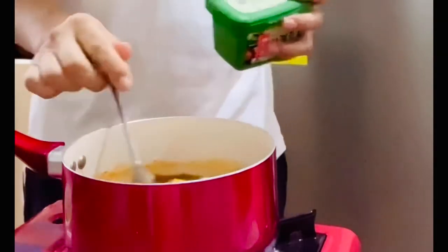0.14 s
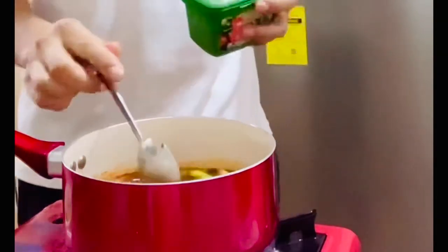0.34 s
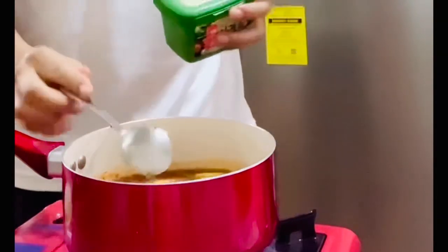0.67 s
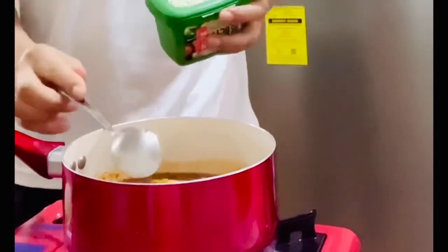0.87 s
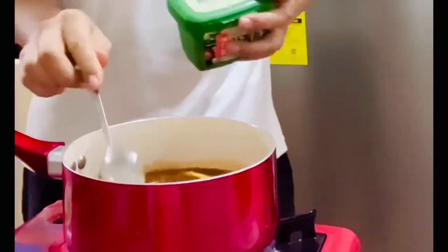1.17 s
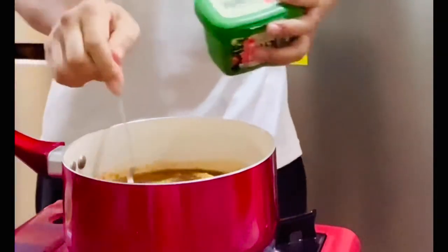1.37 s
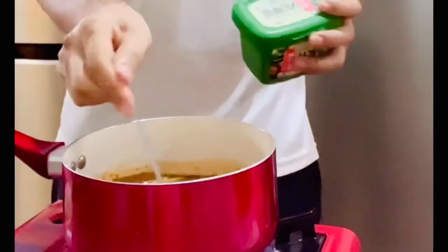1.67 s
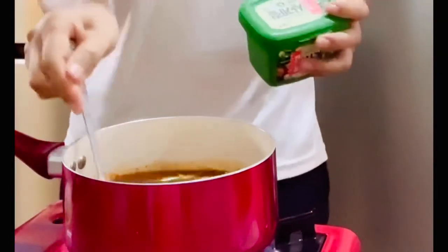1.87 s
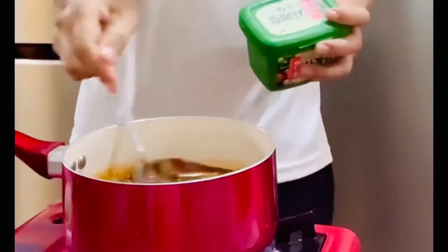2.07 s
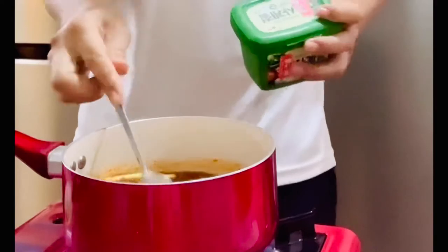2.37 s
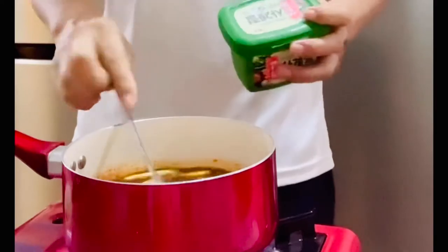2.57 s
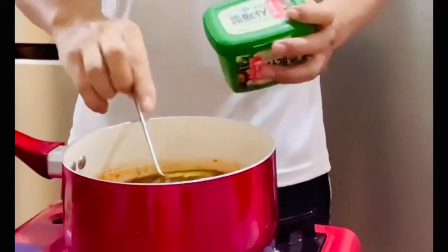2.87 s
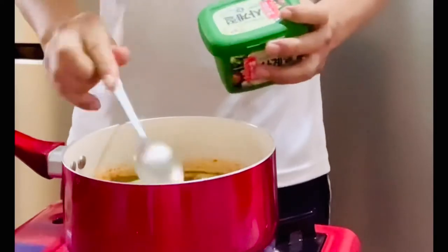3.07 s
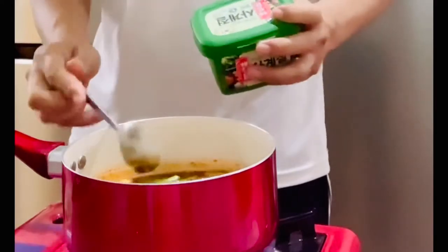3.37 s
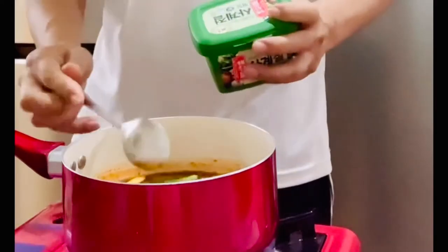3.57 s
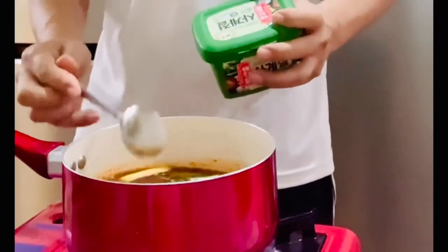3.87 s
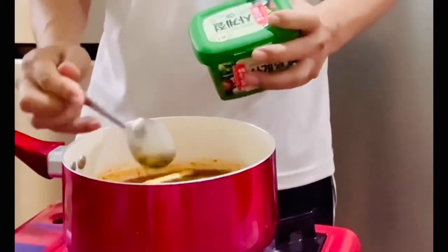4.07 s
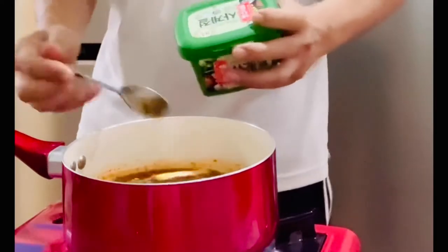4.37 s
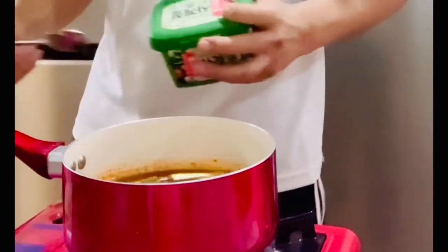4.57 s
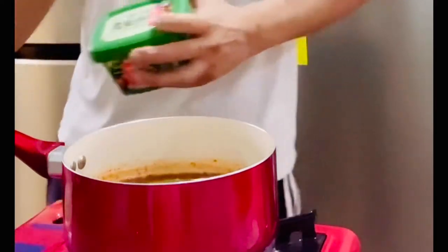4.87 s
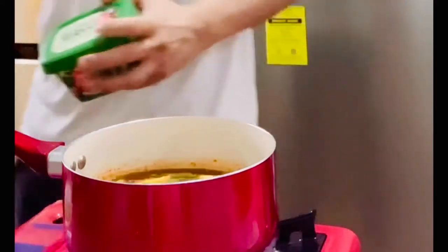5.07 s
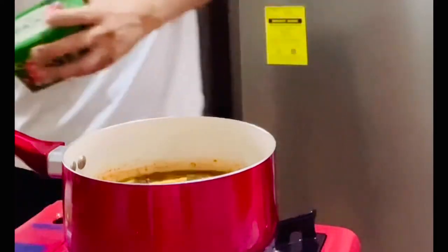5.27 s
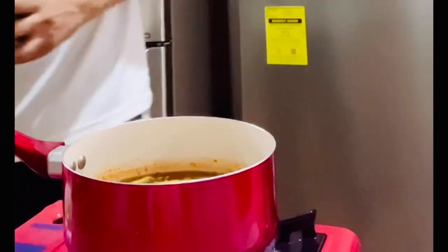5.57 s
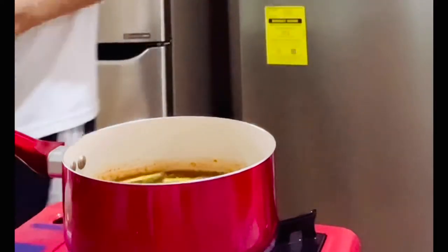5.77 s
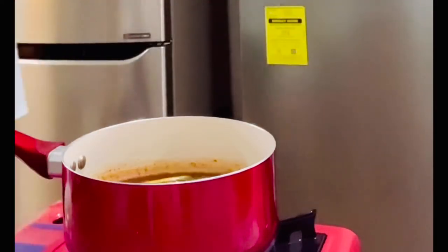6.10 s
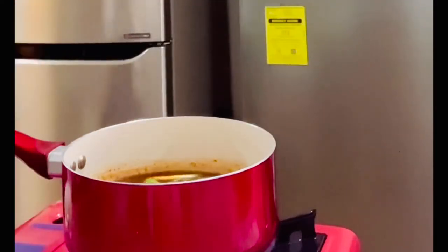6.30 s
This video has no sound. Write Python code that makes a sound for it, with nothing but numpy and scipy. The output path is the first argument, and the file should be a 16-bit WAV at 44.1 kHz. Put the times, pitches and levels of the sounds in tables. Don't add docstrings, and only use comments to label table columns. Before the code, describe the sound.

A metal spoon stirs broth in an enamelled saucepan, taps its rim in sharp ringing knocks, then clatters down on a hard counter.

```python
import sys
import numpy as np
from scipy import signal
from scipy.io import wavfile

SR = 44100
rng = np.random.default_rng(int(sys.argv[2]) if len(sys.argv) > 2 else 0)


def inscribe(sig):
    pcm = np.round(np.clip(np.atleast_2d(sig).T, -1, 1) * 32767)
    wavfile.write(sys.argv[1], SR, pcm.astype(np.int16))


def nominal_scale(level):
    x = np.asarray(level, float) / 20
    return 10 ** x


N = 284004

BAND_EDGES_HZ = np.geomspace(20, 18000, 28)

# freq_hz, level_db_per_hz
AIR_SPECTRUM = [(12, -39), (20, -39.5), (65, 5.5), (91, -19), (131, -4.5), (200, -9.5), (670, -17),
                (1470, -24.5), (1690, -26.5), (2060, -27), (3940, -29), (7100, -31), (9410, -41.5),
                (15200, -28), (16500, -36)]
# freq_hz, left_right_likeness
AIR_LIKENESS = [(60, 1), (95, -0.52), (150, 1), (240, -0.18), (380, 0.37), (600, 0.3), (950, -0.27),
                (1500, -0.071), (2380, -0.22), (3770, 0.16), (5980, -0.59), (9470, 1), (15000, -0.038)]
# freq_hz, left_minus_right_db
AIR_BALANCE = [(60, 4), (240, 0.5), (950, 0), (3770, 2.5), (15000, -1)]
# freq_hz, width_hz, rms_db, left_right_likeness
HUMS = [(28.9, 18, -59, 1), (59.83, 3.9, -57, 1), (127.2, 15, -64, 0.88), (3856, 150, -73.5, 0.53),
        (9274, 280, -70.5, 0.85), (9840, 510, -74, 1), (10450, 930, -72, 1)]
# start_s, level_db
SLOSH = [(0.0, -11), (1.49, -5), (5.04, -1.5)]
# start_s, level_db
RUSTLE = [(4.42, -64), (5.876, -48), (6.09, -56)]

# freq_hz, t60_s
ROOM_T60 = [(100, 0.78), (400, 0.32), (1500, 0.5), (4000, 0.43), (9000, 0.37), (16000, 0.12)]
# freq_hz, left_right_likeness
ROOM_LIKENESS = [(100, 0.4), (400, 0.88), (1500, 0.011), (4000, 0.1), (7000, -0.066), (9500, 0.63),
                 (12500, 0.97), (15000, -1.6)]
# delay_s, level_db
ECHOES = [(.008, 2.5), (0.014, -10.5), (0.033, -24)]

# start_s, level_db
WHINE_SWELLS = [(5.47, -67), (5.92, -75), (6.13, -70), (6.22, -71), (6.33, -61), (6.41, -65)]
# start_s, peak_db
FOOTFALLS = [(6.054, -40)]

# freq_hz, level_db, t60_s
SPOON_MODES = [(4549, -9, .3), (4712, -12, .3), (6105, -15, .25), (7540, -14, .25), (8091, -3, .25),
               (8204, -10, .2), (8900, -2.5, .28), (11180, -2, .27), (11260, -10, .3), (11552, -9, .32),
               (12130, -22, .22), (12550, -7, .4), (13104, -8, .28), (14260, -5, .2), (14326, -3, .3),
               (15500, -12, .1)]
# freq_hz, level_db, t60_s
COUNTER_MODES = [(466, -8.5, 0.17), (478, -5.5, 0.14), (1973, -11, 0.25), (2025, -3.5, 0.15),
                 (3050, -12, 0.08)]
# start_s, peak_db, thud_below_2500_hz_db, edge_above_7000_hz_db, ring_db
DROPS = [
    (4.8374, -14, -16.5, 0, -21),
    (4.8422, -5.5, -14, -22.5, 2),
    (4.9208, -11.5, -19, -18.5, 4.5),
]
# freq_hz, level_db_per_hz
DROP_CRACK = [(59, -40), (100, -16), (135, -3), (279, -21), (460, -4), (750, -11.5), (1030, -3),
              (1360, -70), (2040, 2), (2700, -10.5), (3970, 0), (7070, -19), (7860, 6), (10600, -22),
              (14300, -9), (16600, 4)]
# start_s, peak_db, thud_below_2500_hz_db, edge_above_7000_hz_db
LANDINGS = [(5.0533, -12.5, -17, 1), (5.0703, -15.5, -32, -2), (5.0794, -11.5, -19.5, 7.5),
            (5.0904, -22, -12, 8), (5.0964, -34, -30, 7), (5.1128, -18.5, -14, -5), (5.1664, -16, -17.5, 2)]
# freq_hz, level_db_per_hz
COUNTER_CRACK = [(59, -32), (100, -3), (256, -5), (541, -0.5), (1090, -8.5), (1350, -12), (2200, 0),
                 (2900, 4.5), (4580, 7), (5550, -18), (7810, 7.5), (9670, -34), (14200, -9), (15500, -29),
                 (16500, -43)]
# start_s, level_db, hold_s
CHATTER = [(5.052, -24.5, 0.04), (5.082, -32, 0.084)]

# freq_hz, width_hz, level_db
PAN_FLOOR = [(447, 75.5, 0), (855, 127, -1.5), (1531, 42, -3), (1720, 460, -15.5), (2470, 20, -22),
             (3430, 270, -14), (3840, 400, -21.5)]
# freq_hz, level_db_per_hz
GRIT = [(710, 2), (1200, -5), (1560, -7), (2250, -6), (3510, -4.5), (7100, -21), (7740, -16),
        (12700, -29.5), (16000, -18)]
# start_s, pressure_db, pitch_hz
DRAG = [(1.3, -44.5, 829), (1.316, -47, 834), (1.352, -58, 840.4), (1.52, -52.5, 874),
        (1.784, -53.5, 881.6), (1.84, -43, 891), (1.93, -44, 965), (2.06, -116, 1051)]
# start_s, level_db, pitch_hz
NUDGES = [(0.0, -55, 894), (2.575, -56.5, 983), (2.673, -65, 842)]
# start_s, grit_db, hiss_db
SLIPS = [(0.102, -83, -85), (1.306, -72, -75), (1.358, -53, -59), (1.61, -49, -68), (1.838, -73, -90)]
# start_s, ring_peak_db, tick_peak_db,
# thud_peak_db, pitch_hz
KNOCKS = [(.268, -56, -50.5, -37.5, 944), (1.031, -35, -71, -34.5, 753), (1.311, -47, -40.5, -45.5, 802),
          (2.32, -40, -38.5, -56, 816), (2.555, -46.5, -74, -57, 1006), (2.657, -45.5, -57, -58, 827)]
# pitch_ratio, width_hz, level_db, share_of_tick_hardness
KNOCK_PARTS = [(0.6, 191, -2.5, 0.12), (1, 125, -2, 0.12), (1.95, 171.5, -15, 0.28),
               (2.5, 149, -5, 0.67), (4.15, 200, -12, 0.9), (4.75, 200, -22, 0.65)]

# freq_hz, level_db, t60_s
RIM_MODES = [(127.5, -20.5, 1), (280, -17.5, 0.95), (436.5, -21.5, 0.91), (488, -19, 0.53),
             (562.5, -12, 0.36), (1214, -14.5, 0.18), (2093, -14, 0.2), (2460, -10, 0.037),
             (3932, -14, 0.3), (4080, -16, 0.12), (3940, 3.5, 0.075), (4007, -10, 0.47), (3800, -45, 0.068),
             (5100, -34, 0.042), (5420, -13.5, 0.076), (6350, -45, 0.11), (6370, -11.5, 0.16),
             (6680, -31, 0.1), (7700, -15, 0.035)]
# freq_hz, level_db_per_hz
RIM_CRACK = [(59, -24), (130, -9), (300, -11.5), (471, -2.5), (1200, -16.5), (1420, -20.5), (2040, -8.5),
             (2580, -21), (3400, -11), (3940, -5.5), (4980, -22.5), (6150, -20.5), (6990, -25.5),
             (8110, -21.5), (13800, -36.5), (16000, -35)]
# start_s, peak_db, thud_below_700_hz_db, edge_above_5000_hz_db, ring_db
RIM_TAPS = [
    (0.3839, -19, -27.5, -17.5, -12),
    (0.62, -16.5, -26.5, -11.5, -5.5),
    (2.9289, -16, -30, -14, -18),
    (3.1659, -17, -27.5, -7, -2.5),
    (3.3693, -15.5, -28, -17, -4),
    (3.5749, -14, -26.5, -17, -7.5),
    (3.7729, -12.5, -29.5, -12, -4.5),
    (3.9604, -14, -28.5, -14.5, -8.5),
]
# start_s, peak_db, thud_db, edge_db, ring_db
REBOUNDS = [
    (0.66, -25.5, -10, 0, -11),
    (2.976, -29, -3, -1, -19),
    (0.2675, -37, -15, 8, -7),
]
# start_s, level_db
GRAZES = [(0.62, -46), (2.928, -52), (3.1684, -26.5), (3.771, -33.5), (4.838, -37.5)]


def rms_one(x):
    return x / np.sqrt(np.mean(x ** 2) + 1e-30)


def curve(rows, column, rest):
    rows = np.array(rows)
    return np.interp(np.arange(N) / SR, rows[:, 0], rows[:, column], left=rest, right=rest)


def at_hz(points, hz):
    freq_hz, value = np.transpose(points)
    return np.interp(np.log(hz), np.log(freq_hz), value)


def bandpass(x, low_hz, high_hz):
    return signal.sosfilt(signal.butter(2, [low_hz, high_hz], "band", fs=SR, output="sos"), x)


def bands(x):
    for k, (low_hz, high_hz) in enumerate(zip(BAND_EDGES_HZ, BAND_EDGES_HZ[1:])):
        yield np.sqrt(low_hz * high_hz), bandpass(x[k % 2], low_hz, high_hz)


def spread(mid, side, alike):
    alike = np.clip(alike, -1, 1)
    return np.sqrt(1 + alike) * mid + np.sqrt(1 - alike) * side * [[1], [-1]]


def drift(rate_hz):
    knots = rng.standard_normal(int(N / SR * rate_hz) + 2)
    return np.interp(np.arange(N) / SR * rate_hz, np.arange(len(knots)), knots)


def swells(times_s, levels_db, rise_s, fall_db_s, hold_s=0):
    steps = np.arange(0, N + 16, 16)
    since_s = steps / SR - np.reshape(times_s, (-1, 1))
    past_s = np.clip(since_s - np.reshape(hold_s, (-1, 1)), 0, None)
    shapes = np.clip(1 + since_s / rise_s, 0, 1) ** 2 * nominal_scale(-fall_db_s * past_s)
    return np.interp(np.arange(N), steps, nominal_scale(levels_db) @ shapes)


def resonance(x, hz, width_hz):
    r = np.exp(-np.pi * width_hz / SR)
    zeros = np.array([1, 0, -1]) * (1 - r * r) / 2
    poles = [1, -2 * r * np.cos(2 * np.pi * hz / SR), r * r]
    return signal.lfilter(zeros, poles, x + 1e-18)


def double_resonance(x, hz, width_hz):
    return resonance(resonance(x, hz, width_hz), hz, width_hz)


def clicks(times_s, gains):
    out = np.zeros(N)
    out[np.round(np.array(times_s) * SR).astype(int)] = gains
    return out


def grains(per_s, uneven_db):
    sizes = nominal_scale(uneven_db * np.minimum(rng.exponential(1, N), 5)) * rng.choice([-1, 1], N)
    return rms_one(sizes * (rng.random(N) < per_s / SR))


def coloured(x, spectrum):
    click = (np.arange(5000) == 0) + 1e-18
    response = sum(nominal_scale(at_hz(spectrum, hz)) * band for hz, band in bands([1. * click, -1. * click]))
    return signal.fftconvolve(x, response)[:len(x)]


def blows(table, modes, crack, split_hz, crack_s, crack_db, ring_db, damping, snap_db, impact):
    table, out, t = np.array(table), np.zeros((2, N)), np.arange(SR // 3) / SR
    hz, level_db, t60_s = np.transpose(modes)
    mean_thud_db, mean_edge_db = table[:, 2].mean(), table[:, 3].mean()
    for start_s, peak_db, thud_db, edge_db, own_db, *ring_hz in table:
        lean = [(split_hz[0] * 0.8, thud_db - mean_thud_db), (split_hz[0] * 1.25, 0),
                (split_hz[1] * 0.8, 0), (split_hz[1] * 1.15, edge_db - mean_edge_db)]
        tinted = [(f, db + at_hz(lean, f)) for f, db in crack]
        burst = rng.standard_normal(len(t)) * np.exp(-t / crack_s) * np.clip(t / 0.0031, 0, 1)
        burst = 0.63 * burst / np.sqrt(np.sum(burst ** 2))
        burst[20] += impact
        contact = nominal_scale(crack_db) * coloured(burst, tinted)

        pitch_hz = (hz * (ring_hz[0] / 4010 if ring_hz else 1))[:, None]
        mode_db = rng.normal(0, 1.04, len(hz))
        gains = nominal_scale(level_db + mode_db + at_hz(lean, hz) + ring_db + own_db)
        decay = nominal_scale(-60 * t / (damping * t60_s[:, None]))
        build = 1 - np.exp(-t * pitch_hz)
        rings = gains @ (np.sin(2 * np.pi * pitch_hz * t) * decay * build)

        snap = nominal_scale(snap_db) * np.diff(contact, prepend=0)
        i = round(start_s * SR)
        out[:, i:i + len(t)] += nominal_scale(peak_db) * np.array([contact + rings, contact + rings + snap])
    return out


def air():
    out, together = 0, drift(2.38)
    slosh = swells(*np.transpose(SLOSH), rise_s=0.32, fall_db_s=47.5)
    murmur_db = 1 + 20 * np.log10(1 + slosh)
    for hz, (mid, side) in bands(rng.standard_normal((2, 2, N))):
        lean_db = at_hz(AIR_BALANCE, hz) / 2 * np.array([[1], [-1]])
        wander_db = 0.7 * together + 1.2 * drift(9.6)
        gain = nominal_scale(at_hz(AIR_SPECTRUM, hz) + wander_db + murmur_db * (200 < hz < 5000) + lean_db)
        out = out + gain * spread(mid, side, at_hz(AIR_LIKENESS, hz))
    out = nominal_scale(-53) * rms_one(out)
    for hz, width_hz, level_db, alike in HUMS:
        mid, side = double_resonance(rng.standard_normal((2, N)), hz, width_hz)
        out = out + nominal_scale(level_db) * rms_one(spread(mid, side, alike))
    sleeve = rms_one(bandpass(rng.standard_normal(N), 4500, 15000))
    return out + sleeve * nominal_scale(-9) * swells(*np.transpose(RUSTLE), rise_s=0.027, fall_db_s=146)


def kitchen():
    t, tail = np.arange(SR // 2) / SR, 0
    for hz, (mid, side) in bands(rng.standard_normal((2, 2, len(t)))):
        tail = tail + spread(mid, side, at_hz(ROOM_LIKENESS, hz)) * nominal_scale(-60 * t / at_hz(ROOM_T60, hz))
    returns = 1 + sum(nominal_scale(db + 12.5) * np.exp(-((t - s) / 0.00024) ** 2) for s, db in ECHOES)
    tail = tail * returns * np.clip(t / 0.007, 0, 1)
    return tail / np.sqrt(np.sum(tail ** 2) / 2)


def whine():
    sinking_hz = 1920 - 280 * (np.arange(N) / SR - 5.8)
    phase = 2 * np.pi * np.cumsum(sinking_hz * (1 + 0.009 * drift(40))) / SR
    gain = swells(*np.transpose(WHINE_SWELLS), rise_s=0.046, fall_db_s=130)
    return np.sin(phase) * gain * nominal_scale(4 * drift(25))


def footfall():
    start_s, peak_db = np.transpose(FOOTFALLS)
    push = np.convolve(clicks(start_s, nominal_scale(peak_db + 6.5)), np.hanning(300))[:N]
    return nominal_scale(26) * resonance(push, 71, 32) * 0.078


def spoon_down():
    start_s, chatter_db, hold_s = np.transpose(CHATTER)
    touches = grains(600, uneven_db=5) * swells(start_s, chatter_db, 0.0023, 400, hold_s)
    sing = sum(nominal_scale(level_db) * resonance(touches, hz, 2.3 / (0.26 * t60_s))
               for hz, level_db, t60_s in SPOON_MODES)
    drops = blows(DROPS, SPOON_MODES + COUNTER_MODES, DROP_CRACK, (2500, 7000), crack_s=0.0026,
                  crack_db=18.5, ring_db=-19.5, damping=0.46, snap_db=-9, impact=0.28)
    rocks = blows([(*row, 0) for row in LANDINGS], SPOON_MODES, COUNTER_CRACK, (2500, 7000), crack_s=0.0031,
                  crack_db=15, ring_db=-22, damping=0.58, snap_db=-30, impact=0.071)
    rattle = rocks + nominal_scale(-4.5) * coloured(touches, COUNTER_CRACK)
    rattle = rattle - resonance(rattle, 5600, 1000)
    return drops + rattle + nominal_scale(15) * sing


def pan_floor(x):
    still = sum((-1) ** k * nominal_scale(level_db) * double_resonance(x, hz, 1.1 * width_hz)
                for k, (hz, width_hz, level_db) in enumerate(PAN_FLOOR))
    speed = curve(sorted(DRAG + NUDGES), 2, 845) / 845
    return np.interp(np.cumsum(speed) % (N - 1), np.arange(N), still)


def scraping():
    pressure_db = curve(DRAG, 1, -200)
    nudge_s, nudge_db, _ = np.transpose(NUDGES)
    slip_s, grit_db, hiss_db = np.transpose(SLIPS)
    rub = nominal_scale(pressure_db) + swells(nudge_s, nudge_db, rise_s=0.026, fall_db_s=350)
    steady_grit = nominal_scale(-59.5 + 0.74 * (pressure_db + 52))
    rasp = steady_grit + swells(slip_s, grit_db, rise_s=0.02, fall_db_s=121)
    scrape = rms_one(pan_floor(grains(900, uneven_db=0.5))) * rub * nominal_scale(-4 + 2 * drift(40))
    grit = rms_one(coloured(grains(4000, uneven_db=7.5), GRIT)) * rasp * nominal_scale(-5.5 + 0.23 * drift(30))
    airy = rms_one(bandpass(grains(8600, uneven_db=2), 5000, 11000))
    return scrape + grit + airy * swells(slip_s, hiss_db, rise_s=0.02, fall_db_s=80)


def floor_knocks():
    start_s, peak_db, tick_db, thud_db, pitch_hz = np.transpose(KNOCKS)
    knocks, touch = np.zeros(N), np.pad(np.hanning(16), (0, 4000))
    for at_s, level_db, hard_db, hz in zip(start_s, peak_db, tick_db - peak_db, pitch_hz):
        for ratio, width_hz, part_db, hardness in KNOCK_PARTS:
            ring = double_resonance(touch, ratio * hz, width_hz)
            ring = ring / np.abs(ring).max()
            i = round(at_s * SR)
            knocks[i:i + len(ring)] += nominal_scale(level_db + part_db + hardness * hard_db) * ring
    ticks = coloured(clicks(start_s, nominal_scale(tick_db + 26)), GRIT)
    push = np.convolve(clicks(start_s, nominal_scale(thud_db + 8)), np.hanning(100))[:N]
    return knocks + ticks + resonance(push, 135, 50)


def grazes():
    start_s, peak_db, _, edge_db, _ = np.transpose(RIM_TAPS)
    grit = grains(3000, uneven_db=6.5)
    brush = rms_one(bandpass(grit, 3500, 8500))
    buzz = rms_one(bandpass(grit, 4600, 14000))
    brush_gain = swells(*np.transpose(GRAZES), rise_s=0.018, fall_db_s=3000)
    buzz_gain = swells(start_s + 0.0029, peak_db + edge_db - 15, rise_s=0.007, fall_db_s=346)
    return brush * brush_gain + buzz * buzz_gain


def pitched(taps):
    wet_hz, dry_hz, shaken_dry_s = 3834, 4023, 1.5
    return [(*tap, wet_hz if tap[0] < shaken_dry_s else dry_hz) for tap in taps]


def rim_taps():
    split_hz = (700, 4700)
    taps = blows(pitched(RIM_TAPS), RIM_MODES, RIM_CRACK, split_hz, crack_s=0.0016,
                 crack_db=26, ring_db=-3, damping=0.36, snap_db=6, impact=1.05)
    light = blows(pitched(REBOUNDS), RIM_MODES, RIM_CRACK, split_hz, crack_s=0.0032,
                  crack_db=30, ring_db=-21, damping=0.56, snap_db=-1.5, impact=0.99)
    return taps + grazes() + light


def placed(x, pan_db, lag_s):
    late = np.interp(np.arange(N) - lag_s * SR, np.arange(N), x)
    return np.array([late * nominal_scale(pan_db / 2), x * nominal_scale(-pan_db / 2)])


def scene():
    background = air() + whine() + footfall()
    spoon, stir, taps = spoon_down(), scraping() + floor_knocks(), rim_taps()
    direct = (placed(taps[1], pan_db=3, lag_s=-0.001005) + placed(stir, pan_db=-2.5, lag_s=-0.000096)
              + placed(spoon[1], pan_db=3, lag_s=-0.000015))
    send = nominal_scale(-0.5) * taps[0] + nominal_scale(4) * stir + nominal_scale(1.5) * spoon[0]
    wet = (
        signal.fftconvolve(np.array([send, send]), kitchen(), axes=1)[:, :N] * nominal_scale([[1.2], [-1.2]]))
    return direct + wet + background


def top_cut(x):
    return signal.sosfilt(signal.butter(12, 16780, fs=SR, output="sos"), x)


def record(dry):
    notch_hz, width_hz = 7020, 540
    x = dry - 0.98 * resonance(dry, notch_hz, width_hz)
    x = x - 0.86 * resonance(x, notch_hz, width_hz / 2)
    x = signal.sosfilt(signal.cheby2(12, 70, 16800, fs=SR, output="sos"), x)
    return top_cut(x)


dry = scene()
out = record(dry)
inscribe(out)
```